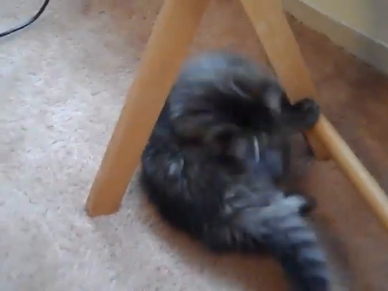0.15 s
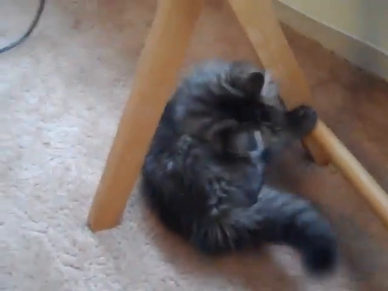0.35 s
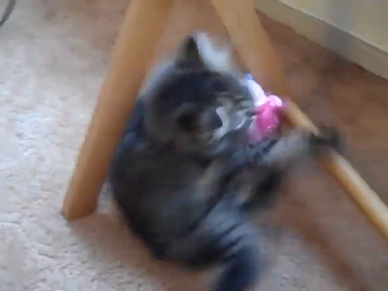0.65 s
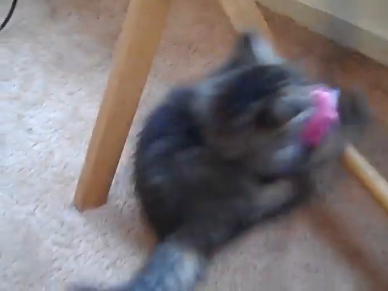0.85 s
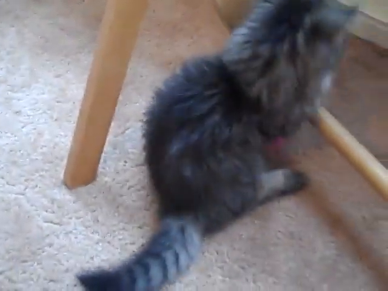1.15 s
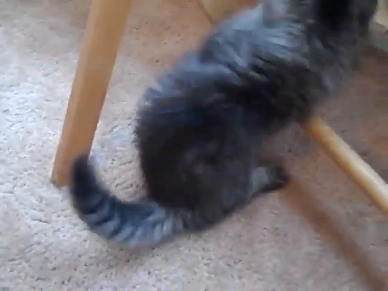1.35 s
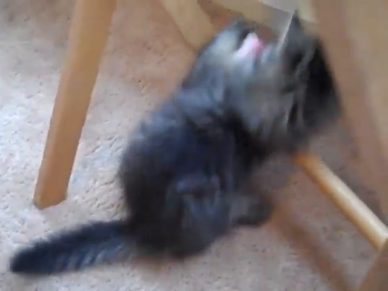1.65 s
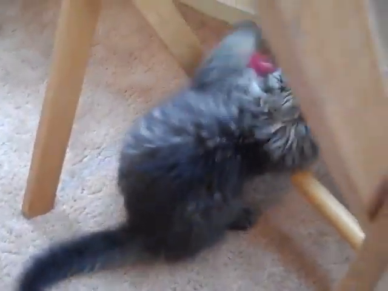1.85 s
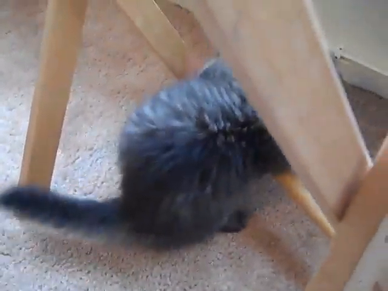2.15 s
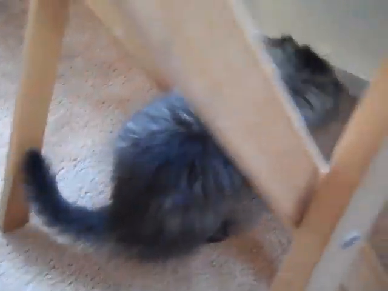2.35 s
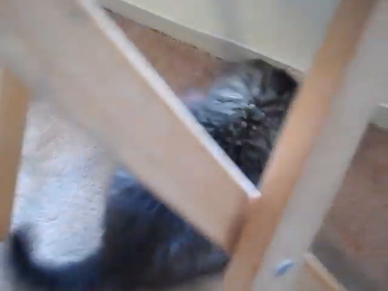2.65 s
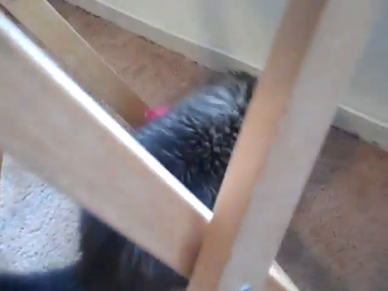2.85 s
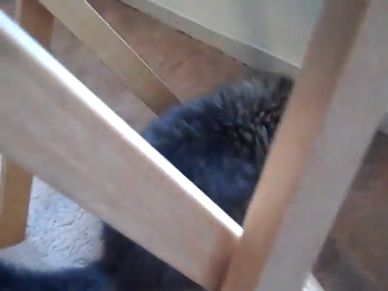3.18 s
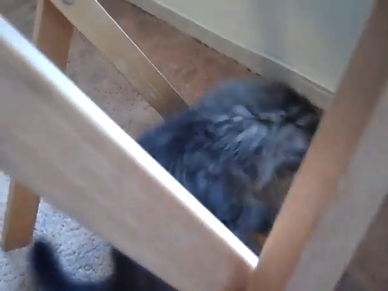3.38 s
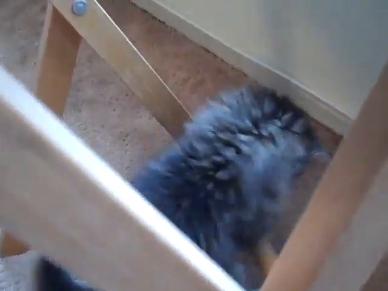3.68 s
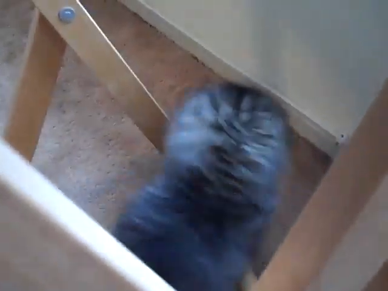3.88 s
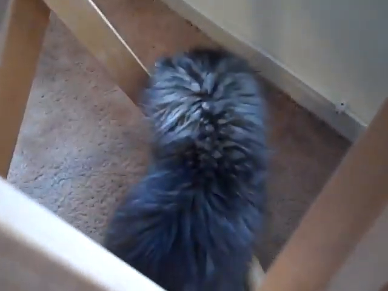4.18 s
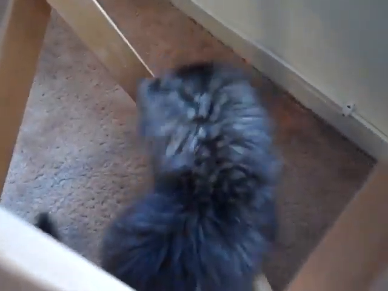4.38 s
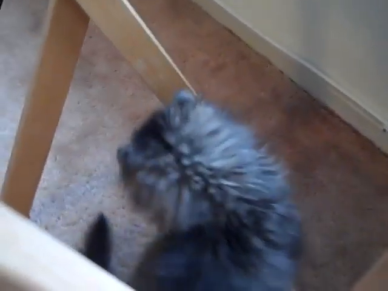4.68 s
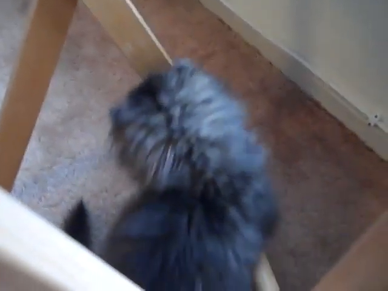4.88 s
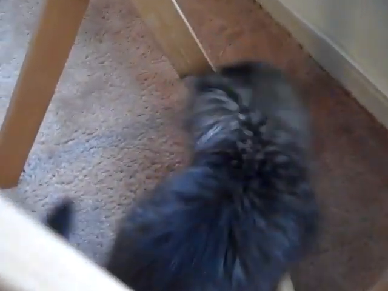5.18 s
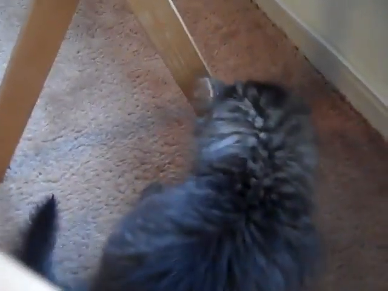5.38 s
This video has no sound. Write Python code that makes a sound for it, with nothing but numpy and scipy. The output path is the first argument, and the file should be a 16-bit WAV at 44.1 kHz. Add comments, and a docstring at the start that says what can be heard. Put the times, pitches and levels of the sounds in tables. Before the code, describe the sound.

A kitten plays with a feather toy on carpet, with light claw scratches, ticks, soft rustles and small knocks on wood.

```python
"""Kitten wrestling a feather toy

On carpet under a wooden chair, fur and feathers rustle as fine hairs slip on the pile. Claws scrape
the wood and tick as they let go; paws knock the rungs and landings ring the floor's low modes.
The quiet room hums faintly. Two small, close microphone ports each add a treble resonance."""
import sys
import numpy as np
from scipy import signal
from scipy.fft import rfft, irfft
from scipy.io import wavfile

SR = 44100
rng = np.random.default_rng(int(sys.argv[2]) if len(sys.argv) > 2 else 0)


def dump_mix(stems):
    """Bounce the given channels to the path in sys.argv[1] as a 16-bit WAV at rate SR."""
    frames = np.atleast_2d(stems).T  # one column per channel
    limited = np.clip(frames, -1, 1)  # hard clip at full scale
    pcm = np.round(limited * 32767).astype(np.int16)
    wavfile.write(sys.argv[1], SR, pcm)


N = 243873

# fur and feathers brushing the pile: t/s, level/dB
RUSTLE_LEVELS = [(0.0, -54.5), (0.12, -56.5), (0.19, -64.5), (0.26, -49.5), (0.37, -62.5), (0.57, -67),
                 (0.61, -61), (0.75, -68), (0.8, -74), (0.9, -64.5), (1.17, -65), (1.34, -76.5),
                 (1.41, -60), (1.52, -56.5), (1.59, -65.5), (1.68, -54), (1.88, -76), (1.94, -55.5),
                 (2.03, -67), (2.19, -66.5), (2.23, -57), (2.36, -62), (2.72, -65.5), (2.82, -66),
                 (3.26, -72.5), (4.1, -65.5), (4.35, -76.5), (4.66, -63), (4.77, -66.5), (4.85, -66),
                 (4.97, -70), (5.3, -78), (5.53, -62)]
# spectrum of fine slips: f/Hz, gain/dB
SLIP_SPECTRUM = [(700, 2), (1500, -12), (3000, -6), (4500, -2), (6000, 3), (8000, 2), (10000, -1.5),
                 (15000, 2)]
# claw scrapes: t/s, treble/dB, wood/dB, left-right/dB, press/s, t60/s
CLAW_SCRAPES = [(0.01, -71, -61.5, -2, 0.054, 0.07), (0.051, -56, -61, -11, .008, 0.058),
                (0.0646, -51.5, -52.5, 2, 0.02, .041), (0.0784, -42.5, -46.5, -4, 0.016, 0.078),
                (0.128, -70, -54.5, -5, .022, 0.068), (0.243, -47, -57, 4, 0.017, 0.13),
                (0.285, -60, -65, 4, 0.026, .05), (0.351, -58, -59.5, -8, 0.014, 0.034),
                (0.98, -54.5, -66, 0, 0.042, 0.085), (1.4337, -46, -74, 3, 0.033, 0.052),
                (1.455, -57, -80, 14, 0.014, .05), (1.474, -53, -67, 16, 0.014, .05),
                (1.4994, -44.5, -57.5, 4, 0.016, 0.021), (1.654, -53.5, -63, 6, 0.034, .083),
                (1.695, -60, -75, 12, 0.018, .04), (1.7157, -51, -61.5, 7.5, 0.036, 0.045),
                (1.9253, -48, -79, 5.5, 0.014, 0.023), (1.982, -55, -68, 7, 0.023, .03),
                (2.15, -50, -78, 9.5, 0.0087, 0.029), (2.298, -61, -71, 0, .015, .039),
                (2.422, -47.5, -84, 10.5, .021, 0.026), (2.7262, -38.5, -52.5, 2, 0.0077, 0.049),
                (2.834, -46.5, -55, 0, 0.0069, 0.099), (3.573, -46.5, -51.5, -4, 0.03, 0.06),
                (3.5955, -76, -50.5, -7, .02, 0.077), (3.74, -66, -65, 10, 0.05, 0.11),
                (3.7935, -65, -56, 2, .014, 0.046), (3.808, -53, -43, 9, 0.02, 0.05),
                (3.838, -54.5, -64.5, 0, 0.016, 0.041), (3.927, -48.5, -56.5, -1, 0.034, .042),
                (3.9707, -42.5, -46, 0, 0.029, 0.024), (3.996, -41.5, -45.5, 8.5, 0.016, 0.031),
                (4.029, -43, -44.5, 0, 0.031, 0.062), (4.181, -69, -63.5, 5, .03, .057),
                (4.2887, -42, -50, -1, 0.0096, 0.014), (4.397, -60.5, -54, 13, 0.023, .06),
                (4.683, -55, -56.5, 6, 0.036, 0.074), (4.713, -52.5, -57, 11, 0.012, 0.022),
                (4.793, -47, -61, 3, 0.011, 0.063), (4.925, -60, -65.5, -3, 0.027, 0.089),
                (5.085, -60, -74, 7, 0.024, .04), (5.28, -59.5, -58.5, 10, 0.011, .025),
                (5.423, -68, -66.5, 22, 0.048, 0.074), (5.502, -61.5, -57.5, 8, 0.05, .06)]
# chair leg resonances: f/Hz, width/Hz, gain/dB
LEG_MODES = [(994, 370, -10), (2090, 73, -8), (2550, 62, -1.5), (3440, 180, -4), (3960, 200, -6.5),
             (5010, 170, -7), (6100, 240, -11)]
# rung resonances: f/Hz, width/Hz, gain/dB
RUNG_MODES = [(1425, 47, -11.5), (2182, 48, -8), (2340, 35, -1), (2920, 110, -10), (3350, 100, -9.5),
              (3790, 134, -13), (5080, 93, -13), (7760, 300, -19)]
# claw ticks: t/s, level/dB, sheen re level/dB, left-right/dB
CLAW_TICKS = [(0.08, -40.5, -8.5, 2), (0.3338, -37.5, -10, -4), (0.4325, -41.5, -7, -1),
              (0.4465, -67, -9, 0), (0.718, -58, -5, 0), (0.737, -57, -1, -5), (1.355, -42, -6.5, 3),
              (1.3724, -45, -5.5, -8), (1.4937, -44.5, 12, 4), (1.5134, -48.5, 1, 12),
              (2.304, -50.5, -12, 5), (2.3328, -50, -14, -1), (2.3453, -51.5, -4.5, -1),
              (2.3748, -60, -2.5, 1), (2.7162, -30, 5, 3.5), (2.7227, -48, -4, 16), (2.7315, -47, 0, 6),
              (2.837, -57, 7, -2), (2.8983, -59, 2.5, -2), (3.3309, -51, -22, 3), (3.811, -45, -10.5, -9),
              (4.088, -51.5, -6.5, 0), (4.4, -53, -6.5, 7), (4.749, -52.5, -2.5, 2), (4.7945, -59, 13, 3),
              (4.812, -53, 0, 3), (5.356, -68, -8, 0)]
# paw knocks on a rung: t/s, level/dB, f/Hz, width/f, t60/s
PAW_KNOCKS = [(0.086, -41, 1050, 0.65, 0.037), (0.2486, -31.5, 990, 0.25, .015),
              (0.833, -40, 970, 0.6, 0.088), (0.837, -41.5, 520, 0.49, 0.16), (.858, -45, 840, 0.29, .04),
              (2.84, -48.5, 880, 1.3, 0.051), (3.141, -45.5, 680, 0.78, 0.014),
              (3.775, -43, 388, 0.22, 0.12), (4.404, -45, 1445, 0.052, 0.03),
              (4.694, -43.5, 406, 0.15, 0.15), (5.282, -36.5, 390, 0.51, 0.047),
              (5.282, -45, 2230, 0.1, 0.028), (5.355, -45.5, 890, 0.96, 0.008)]
# body and paws landing: t/s, drive/dB, contact/ms
LANDINGS = [(.051, -35, 9.3), (.467, -28.5, 11.7), (0.87, -37, 6.5), (0.9833, -18.5, 4.75), (2.841, -34, 7),
            (3.44, -40, 5.9), (3.73, -35.5, 6.1), (4.558, -35, 11.4), (5.278, -37, 5), (5.288, -30, 11.5)]
# floor resonances: f/Hz, gain/dB, t60/s
FLOOR_MODES = [(99, -14, 0.44), (132, -5, 0.13), (197.9, -4.5, 0.18), (259.2, -6, 0.26), (302, 4.5, 0.042),
               (390, 0.5, 0.07), (411, -14, 0.29)]
# air noise spectrum: f/Hz, gain/dB
AIR_SPECTRUM = [(20, 1), (64, 3.5), (128, -3), (170, -3.5), (400, -7.5), (550, -12.5), (1000, -14),
                (2000, -24.5), (4000, -27), (7000, -42), (9000, -38), (15000, -35)]
# air noise likeness: f/Hz, left-right correlation (clipped to +-1 in use)
AIR_LIKENESS = [(60, 0.55), (180, 0.49), (540, 0.4), (1640, 0.35), (4940, -1.3), (14900, -1.1)]
# air noise balance: f/Hz, left-right/dB
AIR_PAN = [(60, 1), (180, 4), (540, 6.5), (1640, 8.5), (4940, 9), (14900, 15.5)]
# house hum: f/Hz, width/Hz, level/dB
HUM_TONES = [(26.18, 2.3, -65.5), (58.2, 3.75, -60), (119.8, 9.3, -63.5)]
# left and right port cavity: f/Hz, width/Hz
PORT_MODES = [(7716, 1290), (6580, 1350)]

SIDES = np.array([[1], [-1]])   # left, right
BINS_HZ = np.maximum(np.fft.rfftfreq(N, 1 / SR), 1)


def fur_rustle(pile_db=-65, pile_follow=0.5):
    """Fine hairs slip on the pile; a lower band follows part of the level swing."""
    times_s, levels_db = np.transpose(RUSTLE_LEVELS)
    level_db = np.interp(np.arange(N) / SR, times_s, levels_db)
    low_db = pile_db + pile_follow * (level_db - level_db.mean())
    hairs = stereo_grains(7000, spread_db=3.5, side_share=1.0) * uneven_contact(rate_hz=35, depth_db=4.0)
    low = rms_one(resonate(stereo_grains(4000, spread_db=1.5, side_share=0.62), 1770, 2180))
    return from_db(level_db) * rms_one(coloured(hairs, SLIP_SPECTRUM)) + from_db(low_db) * low


def claw_scrapes(leg_until_s=0.5, rise_share=0.54, ring_db=25.5, grind_db=-7.5,
                 sheen_db=-10.5, sheen_loss_db_per_db=0.13):
    """Swells of slips, heard directly in the treble and through the wood: first a leg, then a rung."""
    direct = stereo_grains(5000, spread_db=0.0, side_share=0.7)
    slips = stereo_grains(3000, spread_db=2.5, side_share=0.57)
    modes = LEG_MODES + RUNG_MODES
    lightest_db = min(row[2] for row in CLAW_SCRAPES)
    treble_env, sheen_env, wood_env = np.zeros((2, N)), np.zeros(N), np.zeros(N)
    mode_env = np.zeros((len(modes), N))
    spots_db = rng.normal(0, 2.5, (len(CLAW_SCRAPES), len(modes)))   # each spot favours other modes
    for (t_s, treble_db, wood_db, pan_db, press_s, t60_s), spot_db in zip(CLAW_SCRAPES, spots_db):
        at, shape = swell(t_s, rise_share * press_s, (1 - rise_share) * press_s, t60_s)
        touched = slice(0, len(LEG_MODES)) if t_s < leg_until_s else slice(len(LEG_MODES), None)
        loss_db = sheen_loss_db_per_db * (wood_db - lightest_db)
        treble_env[:, at] += from_db(treble_db) * panned(pan_db) * shape
        sheen_env[at] += from_db(treble_db + sheen_db - loss_db) * shape
        wood_env[at] += from_db(wood_db) * shape
        mode_env[touched, at] += from_db(wood_db + ring_db + spot_db[touched, None]) * shape
    ringing = sum((-1) ** k * from_db(db) * resonate(slips * mode_env[k], hz, width_hz)
                  for k, (hz, width_hz, db) in enumerate(modes))
    grind = from_db(grind_db) * wood_env * rms_one(resonate(direct, 1600, 4000))
    wood = ringing + resonate(slips * wood_env, 4900, 2200) + grind
    wood = butter(wood, 4, 8300)   # wood swallows the top
    return treble_env * rms_one(coloured(direct, SLIP_SPECTRUM)) + sheen_env * sheen(direct) + wood


def claw_ticks(click_db=8, body_db=-5.5):
    """A claw tip lets go: one sharp click, then a thin, bright snap with a little body."""
    snap = stereo_grains(20000, spread_db=4.0, side_share=0.64)
    snap_env, sheen_env, clicks = np.zeros((3, 2, N))
    for t_s, level_db, sheen_db, pan_db in CLAW_TICKS:
        at, shape = swell(t_s, rise_s=0.0003, hold_s=0, t60_s=0.015)
        gains = from_db(level_db) * panned(pan_db)
        snap_env[:, at] += gains * shape
        sheen_env[:, at] += gains * from_db(sheen_db) * shape
        clicks[:, at.start] += gains[:, 0] * from_db(click_db)
    bright = rms_one(resonate(resonate(snap, 5970, 3800), 5200, 9000))
    body = from_db(body_db) * rms_one(resonate(snap, 3000, 1800))
    return snap_env * (bright + body) + sheen_env * sheen(snap) + resonate(clicks, 3700, 5600)


def paw_knocks():
    """A soft paw on wood: a short noise burst around the knock's pitch."""
    out, white = np.zeros(N), rng.standard_normal(N)
    for t_s, level_db, hz, width_share, t60_s in PAW_KNOCKS:
        at, shape = swell(t_s, rise_s=0.0015, hold_s=0.0019, t60_s=t60_s)
        burst = np.zeros(N)
        burst[at] = white[at] * shape
        burst[at.start + 20] += 12.0   # click of first contact
        width_hz = width_share * hz
        band = resonate(resonate(burst, hz, width_hz), hz, 2 * width_hz)
        out += from_db(level_db) * band * np.sqrt(9000 / width_hz)
    return out


def floor_thuds():
    """A landing presses the floor and lets it spring back; longer contact favours lower modes."""
    drives = np.zeros((len(FLOOR_MODES), N))
    strengths = from_db(rng.normal(0, 1.5, (len(LANDINGS), len(FLOOR_MODES))))
    for (t_s, drive_db, contact_ms), strength in zip(LANDINGS, strengths):
        phase = np.linspace(0, 2 * np.pi, round(contact_ms * SR / 1000))
        push = np.sin(phase) * (1 - np.cos(phase)) / len(phase)
        start = round(t_s * SR)
        drives[:, start:start + len(push)] += from_db(drive_db) * strength[:, None] * push
    return sum(ring(from_db(db) * drive, hz, t60_s) for drive, (hz, db, t60_s) in zip(drives, FLOOR_MODES))


def reflections(x, t60_s=0.43, level_db=-15, gap_s=0.004):
    """Room reflections: decaying noise after a short gap, different on each side."""
    t = np.arange(SR // 2) / SR
    tail = rng.standard_normal((2, len(t))) * from_db(-60 * t / t60_s) * (t > gap_s)
    tail /= np.sqrt(np.sum(tail ** 2, axis=1, keepdims=True))
    return from_db(level_db) * signal.fftconvolve(x, tail, axes=1)[:, :N]


def room_tone(air_db=-54, hum_pan_db=-2.6):
    """Steady air noise, partly alike on both sides in the bass, plus wavering low tones."""
    mid, side = rfft(rng.standard_normal((2, N)))
    likeness = np.clip(at_hz(AIR_LIKENESS, BINS_HZ), -1, 1)
    air = np.sqrt(1 + likeness) * mid + SIDES * np.sqrt(1 - likeness) * side
    air *= from_db(at_hz(AIR_SPECTRUM, BINS_HZ)) * panned(at_hz(AIR_PAN, BINS_HZ))
    hum = np.zeros(N)
    for hz, width_hz, db in HUM_TONES:
        band = resonate(rng.standard_normal(N), hz, width_hz)
        hum += from_db(db) * rms_one(resonate(band, hz, width_hz))
    return from_db(air_db) * rms_one(irfft(air, N)) + hum * panned(hum_pan_db)


def grains(per_s, spread_db):
    """Random slips of uneven size; rms 1."""
    sizes = from_db(spread_db * np.minimum(rng.exponential(1, N), 5))
    signs = rng.choice([-1, 1], N)
    return rms_one(sizes * signs * (rng.random(N) < per_s / SR))


def stereo_grains(per_s, spread_db, side_share):
    """Slips heard differently at the two ports."""
    return grains(per_s, spread_db) + side_share * grains(per_s, spread_db) * SIDES


def uneven_contact(rate_hz, depth_db):
    """Random gain wandering at up to about rate_hz."""
    return from_db(depth_db * rms_one(butter(rng.standard_normal(N), 2, rate_hz)))


def sheen(x):
    """Finest, highest part of the slips; rms 1."""
    return rms_one(butter(x, 4, 9800, "high"))


def swell(t_s, rise_s, hold_s, t60_s):
    """Sample span and envelope: rounded rise around t_s, hold, exponential fall."""
    start = max(round((t_s - rise_s / 2) * SR), 0)
    t = np.arange(min(round((rise_s + hold_s + t60_s) * SR), N - start)) / SR
    rise = np.sin(np.pi / 2 * np.clip(t / rise_s, 0, 1)) ** 2
    fall = from_db(-60 * np.maximum(t - rise_s - hold_s, 0) / t60_s)
    return slice(start, start + len(t)), rise * fall


def pole_pair(hz, radius):
    """Denominator of a two-pole resonator."""
    return [1, -2 * radius * np.cos(2 * np.pi * hz / SR), radius * radius]


def resonate(x, hz, width_hz):
    """Band-pass resonance, peak gain 1."""
    radius = np.exp(-np.pi * width_hz / SR)
    gain = (1 - radius * radius) / 2
    return signal.lfilter([gain, 0, -gain], pole_pair(hz, radius), x + 1e-18)


def ring(drive, hz, t60_s):
    """Mode that answers a unit click with a decaying sine of height 1."""
    radius = from_db(-60 / (t60_s * SR))
    return signal.lfilter([0, np.sin(2 * np.pi * hz / SR)], pole_pair(hz, radius), drive + 1e-18)


def butter(x, order, hz, kind="low"):
    """Maximally flat low- or high-pass."""
    return signal.sosfilt(signal.butter(order, hz, kind, fs=SR, output="sos"), x)


def coloured(x, spectrum):
    """Signal shaped by a smooth spectrum."""
    return irfft(rfft(x) * from_db(at_hz(spectrum, BINS_HZ)), N)


def at_hz(points, hz):
    """Table read on a log-frequency axis."""
    points_hz, values = np.transpose(points)
    return np.interp(np.log(hz), np.log(points_hz), values)


def panned(db):
    """Left and right gains, db apart."""
    return from_db(SIDES * db / 2)


def from_db(db):
    """Amplitude gain of a level."""
    return 10 ** (np.asarray(db) / 20)


def rms_one(x):
    """Signal scaled to rms 1."""
    return x / np.sqrt(np.mean(x ** 2) + 1e-20)


def scene():
    """Close kitten, its reflections, room tone."""
    kitten = fur_rustle() + claw_scrapes() + claw_ticks() + paw_knocks() + floor_thuds()
    return kitten + reflections(kitten) + room_tone()


def record(dry):
    """Each port cavity is flat below resonance and falls above; circuit hiss joins, the top is cut."""
    hiss_db, cutoff_hz = -62.5, 14150
    ports = []
    for x, (hz, width_hz) in zip(dry, PORT_MODES):
        poles = pole_pair(hz, np.exp(-np.pi * width_hz / SR))
        ports.append(signal.lfilter([sum(poles) / 2] * 2, poles, x))
    wired = np.array(ports) + from_db(hiss_db) * rng.standard_normal((2, N))
    return signal.sosfilt(signal.ellip(10, 0.5, 70, cutoff_hz, fs=SR, output="sos"), wired)


dry = scene()
out = record(dry)
dump_mix(out)
```